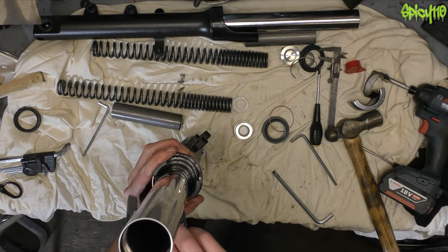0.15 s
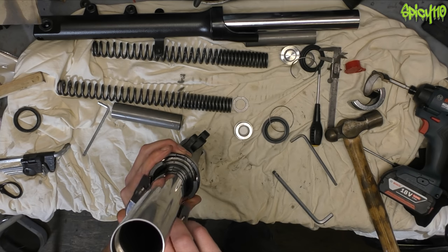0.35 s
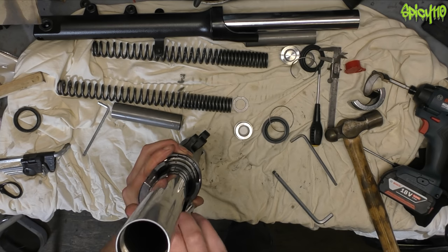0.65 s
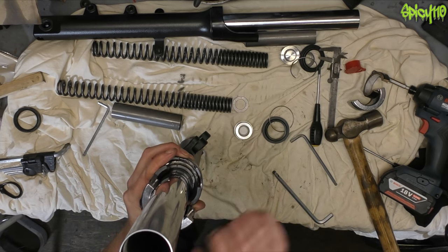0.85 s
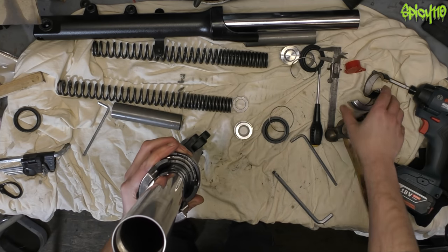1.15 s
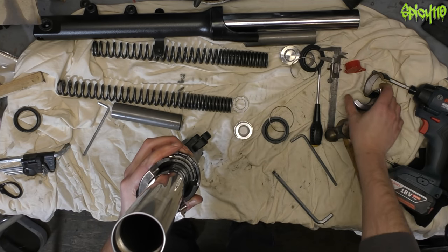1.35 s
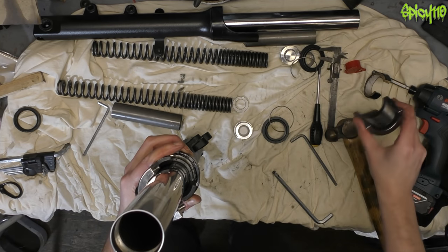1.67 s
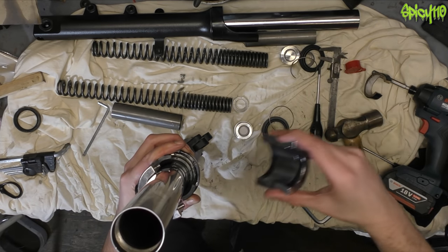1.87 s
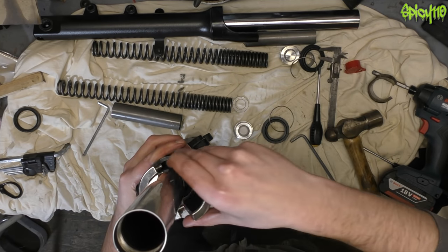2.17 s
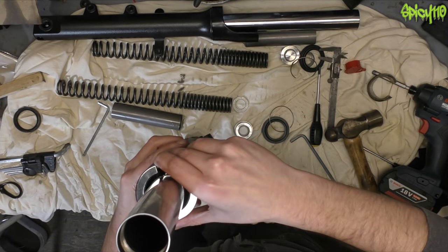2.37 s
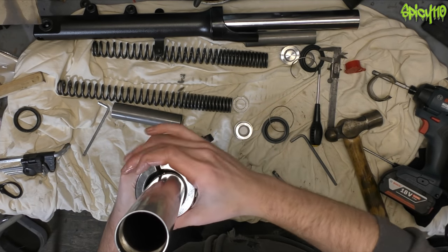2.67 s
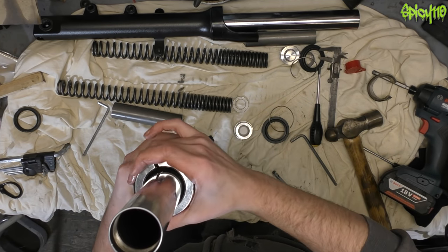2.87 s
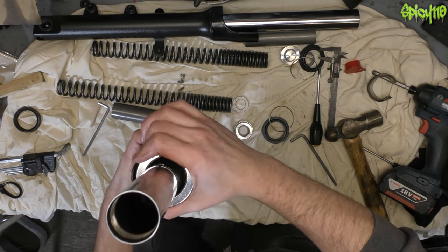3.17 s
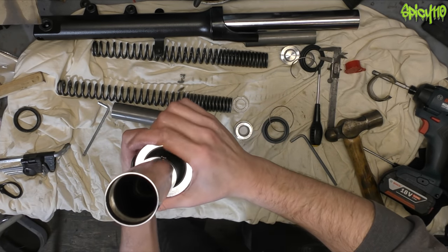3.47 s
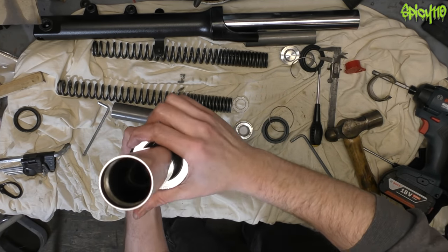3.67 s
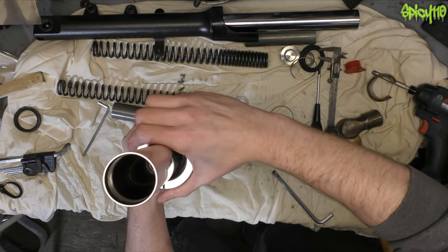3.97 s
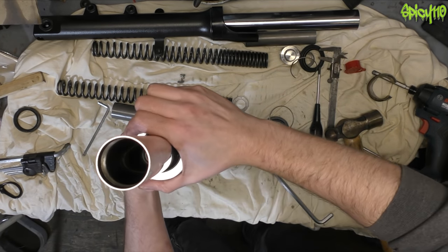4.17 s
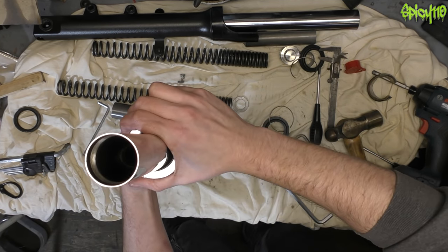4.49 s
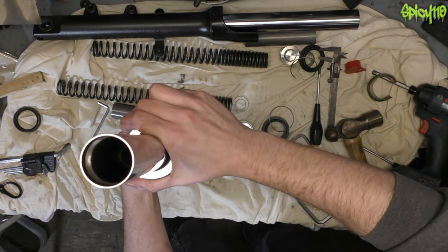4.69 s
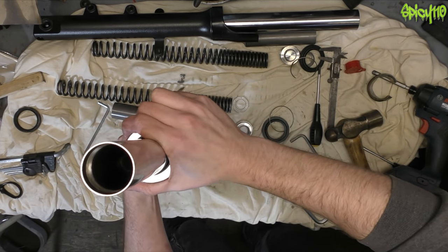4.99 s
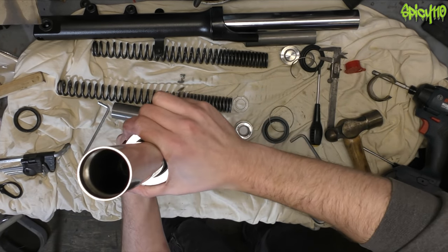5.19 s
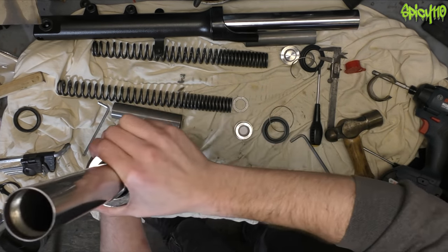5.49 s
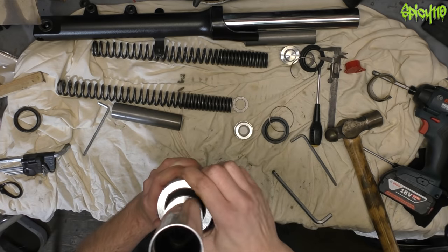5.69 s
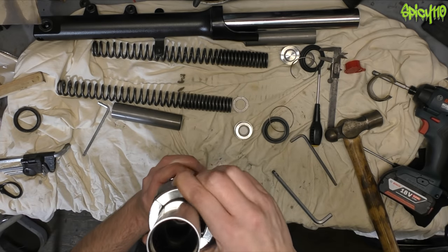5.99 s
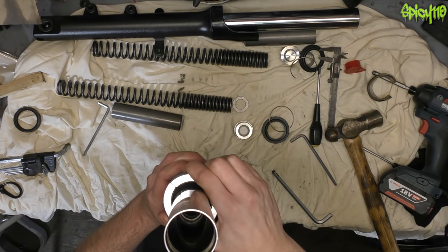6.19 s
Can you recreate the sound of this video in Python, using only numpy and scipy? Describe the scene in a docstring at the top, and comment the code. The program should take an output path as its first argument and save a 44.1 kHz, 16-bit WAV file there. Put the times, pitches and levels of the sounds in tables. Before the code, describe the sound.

Light metallic clinks and faint rubbing over quiet room tone, then three hard rattling steel blows with a thin, high ringing note.

```python
"""Light clinks over room tone, then three hard rattling blows and a part that sings on at one note.
A split steel driver is fitted round a chrome tube and slid down it, on a cloth-covered bench in a workshop.
Contacts are noise cracks plus decaying sine modes; the note is one sine; thumps are low sines and noise.
Tone, stir, rubbing and rustle are shaped noise. Hard blows overload the camera input.
The volume drops before the last two blows; source levels are set ahead of that volume."""
import sys
import numpy as np
from scipy import signal
from scipy.fft import rfft, irfft, next_fast_len
from scipy.io import wavfile
from scipy.ndimage import map_coordinates

SR = 44100
rng = np.random.default_rng(int(sys.argv[2]) if len(sys.argv) > 2 else 0)


def transcribe(signal):
    """Save signal, clipped to [-1, 1], as a 16-bit WAV file at the path in sys.argv[1]."""
    frames = np.atleast_2d(signal).T
    limited = np.clip(frames, -1, 1)
    pcm = np.round(limited * 32767).astype(np.int16)
    wavfile.write(sys.argv[1], SR, pcm)


N = 279814


def amp(db):
    """dB to gain."""
    return 10 ** (np.asarray(db) / 20)


def unit(x):
    """Scale to rms 1."""
    return x / np.sqrt(np.mean(x ** 2) + 1e-20)


def along(points, hz):
    """Interpolate (frequency [Hz], value) points on a log frequency axis."""
    point_hz, value = np.transpose(points)
    return np.interp(np.log(hz + 1), np.log(point_hz + 1), value)


def curve(rows):
    """One value per sample from (time [s], value) rows."""
    return np.interp(np.arange(N) / SR, *np.transpose(rows))


def noise(points, size):
    """Gaussian noise of rms 1 with a (frequency [Hz], density [dB per Hz]) spectrum."""
    m = next_fast_len(size + 2048)
    gain = amp(along(points, np.fft.rfftfreq(m, 1 / SR)))
    spectrum = rfft(rng.standard_normal(m)) * gain
    return unit(irfft(spectrum, m)[:size])


def add(track, s, sound):
    """Mix a sound in at time s, cut at the track end."""
    part = track[round(s * SR):][:len(sound)]
    part += sound[:len(part)]


def favour(hz, near_hz, octaves):
    """dB change away from the favoured note: -6 at the given octaves, quadratic."""
    return -6 * (np.log2(hz / near_hz) / octaves) ** 2


def ring(modes, t, t60, scatter_db, near_hz=None, octaves=1, detune=.003):
    """Decaying modes of random strength and sign, rms 1 at the start; those near near_hz ring most."""
    hz, db = np.transpose(modes)
    db = db + scatter_db * rng.standard_normal(len(hz))
    if near_hz:
        db = db + favour(hz, near_hz, octaves)
    sign = rng.choice([-1, 1], len(hz))
    gain = unit(amp(db - db.max())) * np.sqrt(2 / len(hz)) * sign
    hz = hz * (1 + detune * rng.standard_normal(len(hz)))
    return gain @ np.sin(2 * np.pi * hz[:, None] * t) * amp(-60 * t / t60)


# room tone and hiss: (frequency [Hz], relative density [dB per Hz])
AIR = [(15, -33), (25, -16.5), (64, 2.5), (170, -11), (212, -6.5), (249, -7.5), (451, -10.5), (2160, -24.5),
       (8360, -29.5), (16000, -31.5)]
AIR_DB = -62.5


def room_tone():
    """Steady shaped noise of the room, with hiss."""
    return amp(AIR_DB) * noise(AIR, N)


# arms and cloth: (time [s], level [dB])
STIR = [(0.0, -68), (4.62, -63.5), (5.6, -66.5)]


def stir():
    """Arms and cloth move: low noise at a slowly changing level."""
    return amp(curve(STIR)) * noise([(25, -24), (60, -2.5), (130, 0), (300, -15.0), (600, -47.5)], N)


# hands and steel on chrome: (time [s], level [dB])
SLIDE = [(2.8, -93), (2.95, -69.5), (3.1, -73), (3.33, -67), (3.42, -71.5), (3.6, -65), (3.7, -71.5),
         (3.8, -60.5), (3.9, -65), (3.98, -75), (4.02, -57), (4.06, -78.5), (4.27, -73.5), (4.4, -79.5),
         (5.25, -89.5), (5.42, -66.5), (5.6, -88.5)]
# rubbing colour: (frequency [Hz], relative density [dB per Hz])
RUB = [(1500, -30), (3000, -10), (7000, -7), (10000, 0), (12000, -10), (16000, -28)]


def rubbing(uneven):
    """Sliding friction: treble noise, level wavering by the uneven signal."""
    return amp(curve(SLIDE) + 2.0 * uneven) * noise(RUB, N)


# sleeves on the cloth: (time [s], level [dB])
RUSTLE = [(3.2, -89), (3.28, -56), (3.38, -64), (3.5, -77.5), (5.2, -82.5), (5.3, -62), (5.5, -77),
          (5.6, -78)]


def rustle(uneven):
    """Sleeves drag on cloth: midrange noise wavering with the rubbing."""
    colour = [(200, -30.5), (500, 0.5), (1500, -9.5), (4000, -14.0), (8000, -45.0)]
    return amp(curve(RUSTLE) + 1.2 * uneven) * noise(colour, N)


def background():
    """Sum of tone, stir, rubbing and rustle; the last two share one unevenness."""
    grain = 1500  # samples
    uneven = map_coordinates(rng.standard_normal(N // grain + 4), [np.arange(N) / grain])
    return room_tone() + stir() + rubbing(uneven) + rustle(uneven)


CHATTER_FADE_DB_PER_S = 270  # later touches are weaker


def chatter(t):
    """Envelope of loose parts touching again four times, weaker, within 24 ms."""
    later = t - np.r_[0, rng.uniform(.002, .024, 4)][:, None]
    fade = amp(CHATTER_FADE_DB_PER_S * later[1:, 0])  # later[:, 0] is minus the delay
    strength = np.r_[1, .3 * rng.random(4) * fade]
    return strength @ ((later >= 0) * amp(-60 * np.abs(later) / 0.02))


# tube and driver, low modes: (frequency [Hz], relative level [dB])
KNOCK = [(1100, -4), (1280, -3), (1873, 4), (2100, -1), (2290, -1.5), (2500, -2), (2750, -2), (3300, 5.5),
         (4000, 7.5)]


def knock(t, knock_hz, touches):
    """Short noise crack round knock_hz plus the low modes of tube and driver."""
    band = np.geomspace(100, 8000, num=16)
    skirt = favour(band, knock_hz, np.where(band < knock_hz, 1.1, .6))  # wider on the low side
    crack = noise(np.c_[band, skirt], len(t)) * touches
    return .7 * ring(KNOCK, t, .045, scatter_db=5, near_hz=knock_hz, octaves=.4, detune=.025) + crack


# clink modes, halves closed round the tube: (frequency [Hz], relative level [dB])
CLINK = [(5190, -8.5), (5400, -0.5), (5530, -2.5), (5630, -4), (5790, 2.5), (6020, -4), (6120, -11)]
# clink modes before they close, same columns
LOOSE = [(5300, 0), (5520, 0.022)]
CLAMP_S = 2.45
ROUGH_DB, ROUGH_S, ROUGH_RISE_S = 2.5, .004, 0.015  # flutter depth, grain, onset


def clink(s, t, t60, clink_hz):
    """Clink modes, level fluttering against the loose fit."""
    modes = LOOSE if s < CLAMP_S else CLINK
    tone = ring(modes, t, t60, scatter_db=1.0, near_hz=clink_hz, octaves=0.066)
    flutter = map_coordinates(rng.standard_normal(204), [t / ROUGH_S])
    onset = 1 - np.exp(-t / ROUGH_RISE_S)
    return tone * amp(ROUGH_DB * onset * flutter)


# middle modes: (frequency [Hz], relative level [dB])
MIDDLE = [(4000, 7.5), (4550, -2.54), (6750, 2.4), (7400, -3), (7720, -5.1)]
# contact noise: (frequency [Hz], relative density [dB per Hz])
SPLASH = [(2500, -30), (4200, 0), (6500, 0), (8500, -5), (12000, -16), (16000, -28)]


def middle(t, t60, touches):
    """Middle modes under a chattering splash of noise."""
    modes = ring(MIDDLE, t, 0.77 * t60, scatter_db=5.5)
    return 0.36 * modes + 1.53 * noise(SPLASH, len(t)) * touches


# treble modes: (frequency [Hz], relative level [dB])
HIGH = [(9880, 0), (9960, -2), (10080, -4), (10330, -3), (11070, -3), (11650, -3)]
# top modes, half held free: same columns
LOOSE_TOP = [(11100, 20), (12850, -1), (14300, -3), (15100, -5)]
# top modes afterwards: same columns
TOP = [(13100, -12), (13790, 0), (14050, -4)]
BARE_S = 1  # half held free until then


def treble(s, t, t60, high_hz):
    """Treble modes plus top modes, the top stronger while the half is held free."""
    high = ring(HIGH, t, .8 * t60, scatter_db=3, near_hz=high_hz, octaves=.035)
    if s < BARE_S:
        return high + amp(-2.5) * ring(LOOSE_TOP, t, .4 * t60, scatter_db=4.5)
    return high + amp(-18.5) * ring(TOP, t, 0.46 * t60, scatter_db=3.5)


# workshop decay: (frequency [Hz], t60 [s])
SHOP = [(300, 0.041), (2000, 0.23), (6000, .2), (14000, 0.16)]


def room(x):
    """Fresh noise tail of unit energy, 200 samples late; each frequency dies at its own speed."""
    hz, t, z = signal.stft(rng.standard_normal(SR // 4), SR, nperseg=256)
    fade = amp(-60 * t / along(SHOP, hz)[:, None])
    tail = signal.istft(z * fade, SR, nperseg=256)[1]
    return signal.fftconvolve(np.pad(x, (200, 0)), tail / np.linalg.norm(tail))


# driver on its seat: (time [s], knock [dB], clink [dB], treble [dB], knock [Hz], t60 [s])
BLOWS = [(4.6584, -5, 9.5, 1, 2330, 0.044), (5.7435, -5.5, 11, 5, 2110, 0.027),
         (6.133, -3, 7.4, 1.5, 2270, 0.035)]
# loss per squared rebound number: (knock [dB], clink [dB], treble [dB])
REBOUND_LOSS_DB = (1.14, 2.5, 2)
REBOUND_S = .0105  # gap


def rebounds(count):
    """Each hard blow repeats at short equal gaps, fading faster and faster."""
    loss = np.r_[0, REBOUND_LOSS_DB, 0, 0]
    rows = []
    for blow in BLOWS:
        for k in range(count):
            delay = np.r_[REBOUND_S * k, np.zeros(5)]
            rows.append(np.array(blow) - loss * k ** 2 + delay)
    return rows


# light contacts: (time [s], knock [dB], clink [dB], treble [dB], knock [Hz], t60 under the grip [s])
TAPS = [(0.2142, -20, -19.5, -35.5, 1830, .17), (0.2607, -23, -50, -33, 2130, 0.018),
        (0.321, -44, -70, -75, 2160, .1), (0.4054, -34.5, -46, -55, 2240, 0.14),
        (0.4258, -31, -43.5, -57, 1270, .07), (0.45, -45.5, -61.5, -80, 1320, .1),
        (.5132, -45.5, -61, -68, 1950, 0.097), (.52, -43, -67, -70, 3300, .04),
        (.53, -52, -62, -59, 3000, .04), (.545, -39.5, -62, -56, 3000, .04),
        (0.5545, -25.5, -30, -39, 1940, .13), (.5751, -31.5, -29, -42, 1700, 0.027),
        (0.5964, -36.5, -37, -47, 2440, 0.027), (.608, -39, -37, -52, 1970, 0.048),
        (0.7518, -53, -76, -64, 2210, 0.076), (0.7665, -57, -80, -70, 1620, .1),
        (0.8068, -51, -75, -78, 2110, .07), (1.2335, -50.5, -83.5, -71, 2570, .1),
        (1.4458, -59.5, -80, -72, 2070, 0.083), (2.2564, -24.5, -14.5, -34.5, 2450, 0.047),
        (2.2693, -33.5, -38.5, -60.5, 2470, .13), (2.2775, -24, -30.5, -50, 2500, .19),
        (2.3172, -15, -14.5, -36.5, 3300, .16), (2.3504, -18, -16, -44, 3120, 0.072),
        (2.3584, -20.5, -18.5, -50, 2880, .04), (2.366, -38, -32.5, -46.5, 2520, 0.057),
        (2.3888, -58, -49, -55, 2600, 0.055), (2.5365, -55.5, -52, -76, 2100, .3),
        (2.553, -45, -59, -68, 2500, .05), (2.568, -20, -14, -23, 3200, 0.12),
        (2.779, -51.5, -61, -77, 1960, 0.05), (2.8174, -34, -30, -38.5, 2400, 0.025),
        (2.9856, -21.5, -16, -19.5, 2050, 0.037), (3.2401, -31, -23.5, -35, 3340, 0.039),
        (3.3777, -42, -40, -62.5, 2620, .04), (3.4465, -27.5, -20.5, -26.5, 3090, 0.037),
        (3.542, -48, -55.5, -72, 2200, 0.084), (3.7102, -45.5, -39.5, -62, 3580, 0.02),
        (3.741, -53, -48.5, -55.5, 2000, .045), (3.818, -55, -58, -45, 2720, .035),
        (3.9057, -43.5, -41, -49.5, 2810, 0.081), (3.9244, -51, -48, -51.5, 2690, 0.079),
        (4.0143, -55, -73, -62, 2880, .1), (4.0746, -27, -12, -12.5, 3010, 0.041),
        (4.1894, -31.5, -28, -38.5, 2626, 0.03), (4.368, -57.5, -68.5, -81.5, 1527, 0.1),
        (4.7556, -53, -48.5, -35, 3300, 0.056), (4.9815, -59, -80.5, -69, 2226, .1),
        (5.2881, -52, -74, -76, 796, 0.11), (5.6622, -58, -50.5, -51, 2630, 0.12),
        (5.7303, -39, -40, -50, 2320, 0.11), (5.7395, -23, -18, -33, 2200, .05),
        (5.8516, -42, -36, -24.5, 3180, .05), (5.861, -35, -42, -30, 3760, 0.044),
        (5.9019, -39.5, -54.5, -56, 2280, .1), (5.9195, -29, -24, -32, 3160, 0.025),
        (6.034, -40, -39.5, -56, 2340, .07), (6.107, -33.5, -47, -56, 2470, 0.2),
        (6.1264, -21, -25, -42, 2500, .05), (6.257, -40, -48, -25, 3330, 0.072),
        (6.2726, -45, -28, -23.5, 4020, 0.029), (6.291, -36, -38, -43, 3350, 0.061),
        (6.3, -33, -40, -42, 3130, 0.043), (6.32, -38, -45.5, -55, 3930, 0.091)]
# how parts sit: (time [s], favoured clink [Hz], favoured treble [Hz],
# middle [dB re mean of knock and treble dB])
FIT = [(.4, 5360, 10270, -2.5), (.55, 5200, 9700, 0), (2.199, 5420, 9700, -9.5), (2.45, 5445, 9500, -4.5),
       (2.9, 5640, 9700, -8.5), (4.3, 5610, 9900, -6), (4.6, 5431, 9860, 2.5), (6.2, 5430, 10200, 1),
       (6.25, 5730, 11500, 5)]
SCATTER = 0.01  # share by which favoured notes vary


def contacts():
    """Each touch cracks and rings the families of modes, damped by the hand."""
    out, t = np.zeros(N), np.arange(SR // 5) / SR
    fit_s, *fit = np.transpose(FIT)
    for s, knock_db, clink_db, high_db, knock_hz, t60 in TAPS + rebounds(count=4):
        t60 = np.clip(t60, .02, .4)
        vary = 1 + SCATTER * rng.standard_normal(2)
        clink_hz, high_hz, middle_db = (np.interp(s, fit_s, column) for column in fit)
        clink_hz, high_hz = vary * [clink_hz, high_hz]
        middle_db = middle_db + (knock_db + high_db) / 2
        touches = chatter(t)
        hit = amp(knock_db) * knock(t, knock_hz, touches)
        hit = hit + amp(clink_db) * clink(s, t, t60, clink_hz)
        hit = hit + amp(middle_db) * middle(t, t60, touches)
        hit = hit + amp(high_db) * treble(s, t, t60, high_hz)
        hit = hit * (1 - np.exp(-t / 0.00017))
        add(out, s, hit)
        add(out, s, amp(-13.5) * room(hit))
    return out


# blows that start the note: (time [s], level [dB], t60 [s], grip [dB/s^2])
SINGS = [(.216, -45, 2.3, 39), (.554, -72, 2.1, 73), (.767, -64.5, 0.69, 122), (4.66, -24, 1.13, 86),
         (5.662, -57.5, 6, -5), (5.745, -17.5, 0.48, -24), (6.133, -27, 0.91, 9)]
SING_HZ = 3688
LINGER_DB, LINGER_S = -38.5, 18  # part that escapes the grip: level re note, t60


def singing():
    """One lightly damped mode; the grip term bends its decay, a faint part escapes it."""
    out, t = np.zeros(N), np.arange(2 * SR) / SR
    for s, db, t60, grip in SINGS:
        gripped = amp(db - 60 * t / t60 - grip * t ** 2)
        linger = amp(db + LINGER_DB - 60 * t / LINGER_S)
        onset = 1 - np.exp(-t / 0.0021)
        add(out, s, (gripped + linger) * onset * np.sin(2 * np.pi * SING_HZ * t))
    return out


# thumps: (time [s], level [dB], swing [Hz], puff [dB re level])
THUDS = [(0.264, -24, 100.5, -21), (.32, -30.5, 99, -17.5), (0.423, -45, 153, 3.5),
         (.599, -31.5, 96.5, -15), (2.328, -36.5, 117, -10), (2.389, -38, 152.4, -15),
         (2.571, -42.5, 154.4, -9), (2.99, -49, 120, -5), (3.451, -42, 105, -14), (4.129, -35, 120, -24),
         (4.66, -27.5, 48.1, 2.5), (5.75, -6, 127.8, -5.5), (6.136, -7, 139, -4)]
BOARD_S = .14  # swing t60


def bench():
    """The board under the cloth answers with a low two-sine swing and a short dull puff."""
    out, t = np.zeros(N), np.arange(SR // 2) / SR
    colour = [(25, -21), (70, -8.5), (170, -4.0), (400, -10.5), (900, -14), (2000, -36.5)]
    for s, db, hz, puff_db in THUDS:
        puff = amp(puff_db - 60 * t / 0.21) * noise(colour, len(t))
        swing = np.sin(2 * np.pi * hz * t) + 0.51 * np.sin(2 * np.pi * 1.5 * hz * t)
        swing = swing * amp(-60 * t / BOARD_S)
        add(out, s, amp(db) * (swing + puff) * (1 - np.exp(-t / .004)))
    return out


def scene():
    """All sources at one microphone."""
    return (background() + contacts() + singing() + bench())[None]


# volume: (time [s], gain [dB])
VOLUME = [(5.66, -1.5), (5.73, -18)]
CAMERA_HZ, TOP_HZ = 16000, 17480  # stopband edges


def record(dry):
    """Input clip, camera low-pass, volume curve, output clip, steep final low-pass."""
    clipped = np.clip(dry, -1.1, 1.1)
    camera = signal.cheby2(14, 40, CAMERA_HZ, fs=SR, output="sos")
    final = signal.cheby2(14, 40, TOP_HZ, fs=SR, output="sos")
    turned = signal.sosfiltfilt(camera, clipped) * amp(curve(VOLUME))
    return signal.sosfiltfilt(final, np.clip(turned, -.97, .97))


dry = scene()
out = record(dry)
transcribe(out)
```